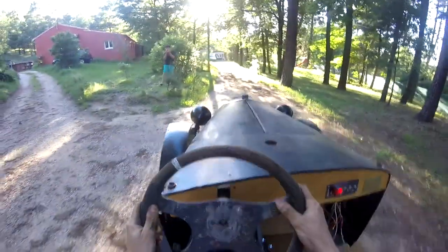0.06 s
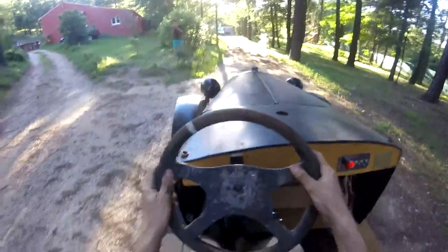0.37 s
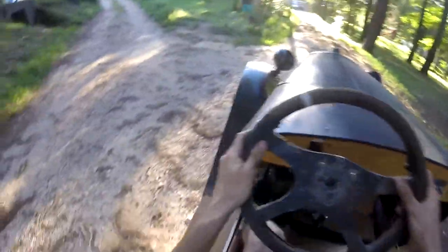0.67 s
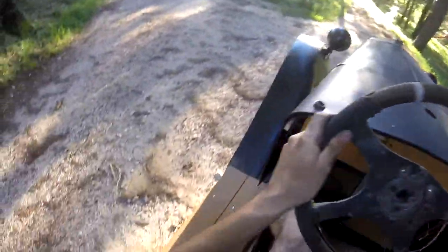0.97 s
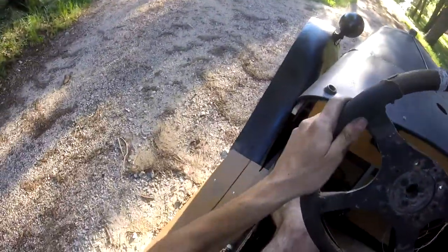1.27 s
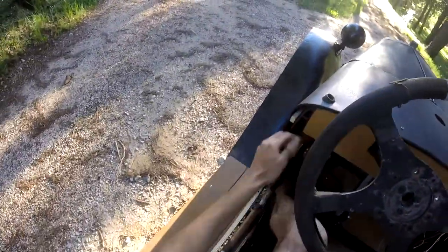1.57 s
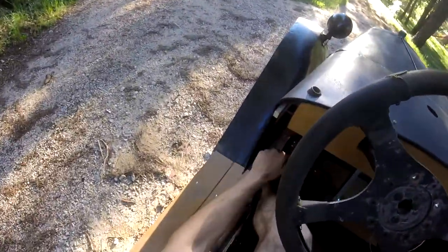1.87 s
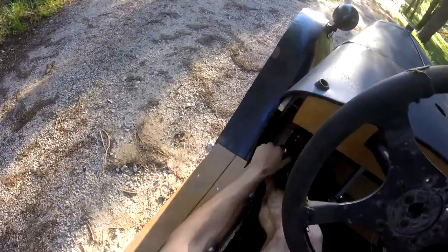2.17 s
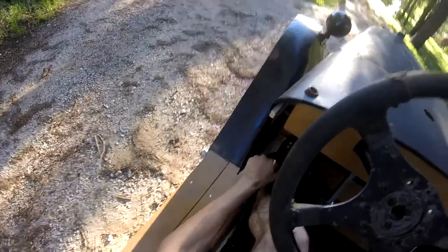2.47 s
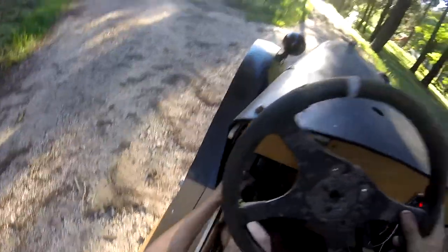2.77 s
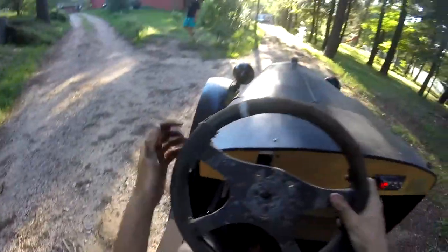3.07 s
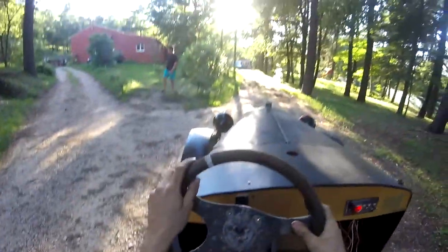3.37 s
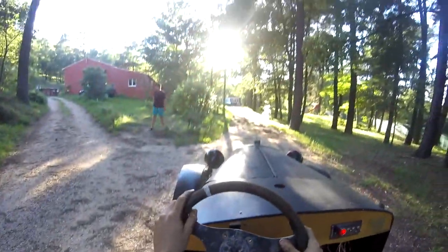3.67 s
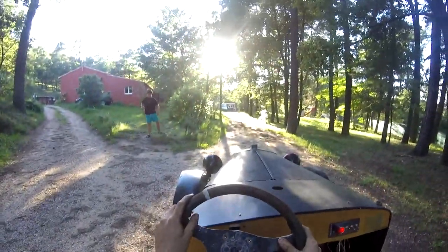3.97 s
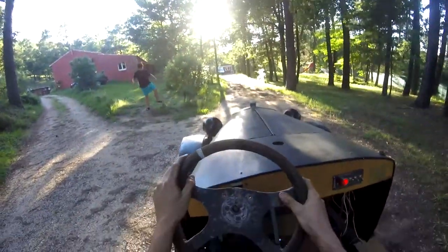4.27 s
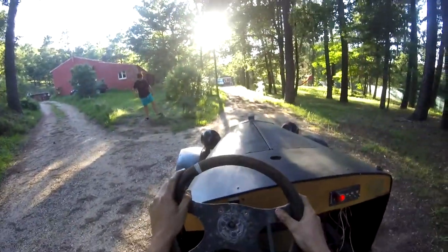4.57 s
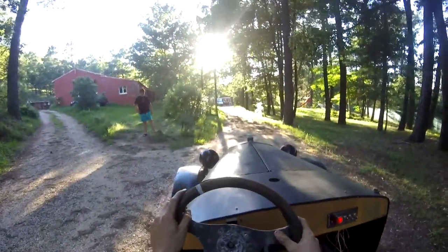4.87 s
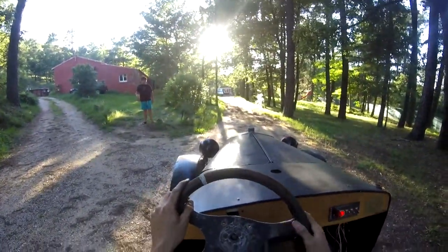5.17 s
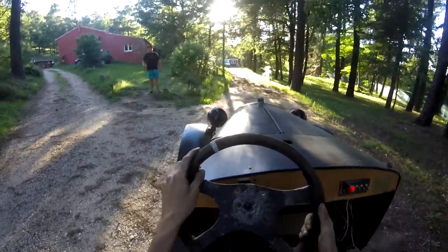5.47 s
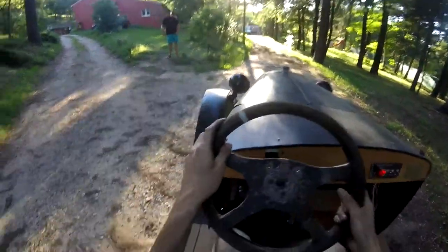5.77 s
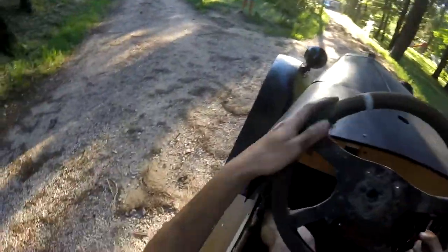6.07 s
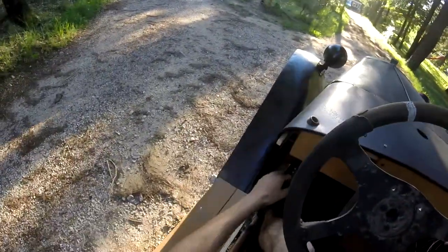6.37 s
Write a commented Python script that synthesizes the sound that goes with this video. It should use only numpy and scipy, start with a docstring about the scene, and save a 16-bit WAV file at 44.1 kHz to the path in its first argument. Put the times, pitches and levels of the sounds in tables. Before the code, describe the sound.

A two-cylinder engine chugs close by as a small open car creeps along outdoors. The exhaust booms in quick, uneven beats under a metallic valve clatter, and the revs climb slowly as the engine takes on load. Loose parts knock a few times. Twice the clatter recedes and the exhaust stands out. A low rumble and faint hiss lie behind, all heard from the driver's seat.

```python
"""On gravel, in the driver's seat of a creeping open kit car; one microphone, close, at the driver's head.
The flat-twin's cylinders fire in turn into a booming exhaust, one with a sharp crack and one muffled,
and the revs slowly rise. Valve gear clatters four times a cycle, a softer puff comes late in each, the
intake rushes and loose parts knock; behind them lie a low rumble, fan hiss and a thin tone. Twice the
driver leans out over the side, away from the engine, and the clatter recedes."""
import sys
import numpy as np
from scipy import signal
from scipy.fft import rfft, irfft, next_fast_len
from scipy.io import wavfile
from scipy.ndimage import uniform_filter1d, map_coordinates

SR = 44100
rng = np.random.default_rng(int(sys.argv[2]) if len(sys.argv) > 2 else 0)


def pcm_store(signal):
    """Save signal as 16-bit PCM."""
    levels = np.round(np.clip(np.atleast_2d(signal), -1, 1) * 32767)
    wavfile.write(sys.argv[1], SR, levels.astype(np.int16).T)


N = 287091
T = np.arange(N) / SR
UNEVEN_DB = .3  # spread from one blast, or one intake breath, to the next

# Spectrum of rattling metal. Each row: frequency in Hz, relative level in dB.
METAL_SPECTRUM = [(900, -26), (1400, -4), (2000, 8.5), (2450, 1), (2800, 2.5), (3500, 3.5), (4500, 1),
                  (5500, -2), (6800, -4.5), (9000, -14), (11000, -16), (13500, -25), (15000, -59)]


def amp(db):
    """Decibels to gain."""
    return 10 ** (np.asarray(db) / 20)


def unit(x):
    """Scales to rms 1."""
    return x / np.sqrt(np.mean(x ** 2) + 1e-20)


def curves(rows):
    """Each column of a time table, at every sample."""
    times, *columns = np.transpose(rows)
    return [np.interp(T, times, column) for column in columns]


def bump(centre_s, half_s):
    """A bell curve in time, of height 1."""
    return np.exp(-((T - centre_s) / half_s) ** 2)


def spectrum(rows, hz, column=1):
    """Gain of one dB column of a frequency table."""
    table = np.transpose(rows)
    return amp(np.interp(np.log(hz + 1), np.log(table[0] + 1), table[column]))


def colour(x, rows):
    """Gives x a spectrum, at rms 1."""
    size = next_fast_len(N)
    gain = spectrum(rows, np.fft.rfftfreq(size, 1 / SR))
    return unit(irfft(rfft(x, size) * gain, size)[:N])


def highpass(x, hz, order):
    """Cuts the bass below hz."""
    return signal.sosfilt(signal.butter(order, hz, "high", fs=SR, output="sos"), x)


def resonance(x, hz, width_hz):
    """One resonance of gain 1."""
    return signal.lfilter(*signal.iirpeak(hz, hz / width_hz, fs=SR), x)


def causal(gain):
    """The impulse response that has this gain and rings only after the blow."""
    log_gain = np.log(np.maximum(gain, 1e-6))
    mirrored = np.r_[log_gain, log_gain[-2:0:-1]]
    minimum_phase = np.exp(np.conj(signal.hilbert(mirrored)))
    return np.fft.ifft(minimum_phase).real[:len(gain)]


def ring(x, response):
    """Convolution, cut to length."""
    return signal.oaconvolve(x, response)[:N]


def dying(t60):
    """A quarter second of decay, falling 60 dB in t60 seconds."""
    return np.exp(-np.log(1000) * T[:SR // 4] / t60)


def strokes(cycles, share, spread_db, early_s=0.):
    """One click an engine cycle at the given share of it, each a little different in size."""
    places = np.arange(int(cycles[-1]) + 1) + share
    times = np.interp(places, cycles, T, right=T[-1] + 1) - early_s
    size = amp(spread_db * rng.standard_normal(len(times)))
    heard = (times >= 0) & (times < T[-1])
    return np.bincount((times[heard] * SR).astype(int), size[heard], N)


def leaning():
    """How far driver and microphone lean out, from 0 upright to 1; each move starts and ends gently."""
    # Each row: start of the lean, time back upright, length of a move, all in seconds.
    leans = [(.4, 3.41, 1), (5.5, 8, 0.61)]
    ramps = sum(np.clip(np.minimum(T - start, end - T) / move, 0, 1) for start, end, move in leans)
    return np.sin(np.pi / 2 * ramps) ** 2


def rumble(level_db):
    """Steady low rumble with a few hollow peaks in the low middle."""
    # Each row: frequency in Hz, relative level of the rumble in dB.
    rumble_spectrum = [(15, 0), (40, 0), (100, 2), (180, 2), (250, -3), (330, 4), (400, 0), (500, 3),
                       (590, 4), (670, 1), (760, 3), (880, -4), (960, -2), (1300, -16), (3000, -60)]
    return amp(level_db) * colour(rng.standard_normal(N), rumble_spectrum)


def thin_tone(waver):
    """A faint, slightly unsteady sine, perhaps a dragging brake."""
    # Each row: time in seconds, pitch in Hz, level in dB.
    tone_path = [(0, 490, -70), (.9, 490, -43), (2.4, 540, -54), (3.6, 592, -89), (4.5, 619.6, -43),
                 (5.9, 627, -38), (6.5, 600, -36)]
    hz, level_db = curves(tone_path)
    drift = unit(uniform_filter1d(rng.standard_normal(N), size=2000))
    phase = 2 * np.pi * np.cumsum(hz * (1 + waver * drift)) / SR
    return np.sqrt(2) * amp(level_db) * np.sin(phase)


def cooling_fan(level_db):
    """The fan hisses evenly, with no bass."""
    # Each row: frequency in Hz, relative level of the hiss in dB.
    hiss_spectrum = [(1400, 6.5), (2800, -10), (3800, 1), (5000, -1), (7000, -5.5), (9000, -12.5),
                     (11000, -18.5), (13500, -25), (15000, -37)]
    return amp(level_db) * colour(highpass(rng.standard_normal(N), hz=900, order=4), hiss_spectrum)


def intake(cycles, load, press, lean):
    """The intake opens with the accelerator, pulses at each piston's draw and rasps alike each cycle."""
    # Each row: frequency in Hz, relative level of the rush in dB.
    rush_spectrum = [(1000, 13), (1350, -16.5), (1700, 3.5), (2000, 2.5), (2250, -1.5), (2430, 2.5),
                     (2750, -12.5), (3300, -2.5), (6000, -42)]
    repeat = .35  # share of the power that is the same in every cycle
    level_db = -42.5 + 3 * load + 2.5 * press - .5 * lean
    draw = 1 + .068 * np.cos(4 * np.pi * (cycles - .06))
    rush, breath = highpass(rng.standard_normal((2, N)), hz=900, order=4)
    breath = breath[:SR // 10] * signal.windows.tukey(SR // 10)
    rasp = colour(ring(strokes(cycles, 0, UNEVEN_DB), breath), rush_spectrum)
    air = np.sqrt(repeat) * rasp + np.sqrt(1 - repeat) * colour(rush, rush_spectrum)
    return amp(level_db) * draw * air


def late_puff(cycles):
    """A softer puff late in each cycle, ringing on two hollow notes."""
    # Each row: time in seconds, level of the low note in dB, level of the high note in dB.
    puff_levels = [(0, -27, -27), (1.4, -31, -30), (2.6, -24, -28), (3.3, -18.5, -21), (4.1, -19, -19),
                   (4.9, -30, -21), (5.6, -34, -22), (6.5, -28, -17)]
    low_hz, high_hz, rise_s = 321.5, 592.6, .006
    rough, width_hz = .7, 130  # share of turbulence in the puff, and its bandwidth
    t = T[:SR // 10]
    swell = (t / rise_s * np.exp(1 - t / rise_s)) ** 2
    clicks = strokes(cycles, share=.705, spread_db=.2)
    out = np.zeros(N)
    for hz, db in zip((low_hz, high_hz), curves(puff_levels)):
        puffs = clicks * amp(db)
        whirl = unit(resonance(resonance(rng.standard_normal(N), hz, width_hz), hz, width_hz))
        note = ring(puffs, swell * np.sin(2 * np.pi * hz * t))
        out += np.sqrt(1 - rough) * note + np.sqrt(rough / 2) * ring(puffs, swell) * whirl
    return out


def knocks(rattle_t60):
    """Loose parts knock: each rings one note and shakes out a brief metallic rattle."""
    # Each row: start in seconds, level in dB, pitch in Hz, t60 in seconds, rattle in dB re the knock.
    hits = [(0.552, -18, 206, 0.11, -20.5), (0.552, -26, 1890, 0.044, -6), (0.572, -32, 1930, .05, -4),
            (0.576, -12, 150, 0.082, -23), (.632, -16, 229, 0.16, -29), (0.73, -33, 3900, 0.031, 3),
            (0.904, -35, 4700, .03, 0), (1.996, -17, 167, 0.18, -14), (2.109, -14.5, 460, 0.11, -33),
            (3.692, -24, 4370, 0.033, -4), (4.084, -31, 4480, 0.024, -11), (4.616, -30, 4420, 0.036, 3),
            (4.989, -28, 4420, 0.034, -12), (5.724, -25, 4400, 0.029, -17)]
    grit = colour(rng.standard_normal(N), METAL_SPECTRUM)
    out = np.zeros(N)
    for start_s, db, hz, t60, rattle_db in hits:
        fade = dying(t60)
        span = slice(round(start_s * SR), round(start_s * SR) + len(fade))
        note = fade * np.sin(2 * np.pi * hz * T[:len(fade)])
        rattle = amp(rattle_db) * dying(rattle_t60) * grit[span]
        out[span] += amp(db) * (note + rattle)
    return out


def clatter(cycles, load, press, lean):
    """Tappets and gear lash strike the crankcase; each clack has its own rings and some loose rattle."""
    # The four clacks. Each row: place as a share of the cycle, level upright at idle in dB, change
    # leaning out in dB, change per step of load in dB, t60 in seconds, centre of a treble band in Hz,
    # boost or cut of that band in dB.
    clacks = [(.005, -23.5, -9, -2.5, 0.032, 3300, -2.5), (.218, -33.5, 0.5, 0.64, 0.065, 6600, 2),
              (.462, -28.5, -6, -1, 0.04, 8600, 9), (.765, -40, -11, 1.5, 0.15, 7500, -10)]
    # Modes of the struck parts, one list a clack. Each row: pitch in Hz, t60 in seconds, level in dB
    # re the clack, change leaning out in dB, change per step of load in dB.
    part_modes = [
        [(1682, 0.071, -12.5, 13.5, -2), (1984, 0.21, -26, 6, 7.5), (2135, 0.059, -21.5, 0, 7.5),
         (3153, 0.041, -6.5, -17, -5), (4350, 0.018, 0.5, -7, 0)],
        [(2020, 0.13, -17.5, 2.5, 6.5), (2093, 0.073, 1.5, -6, -5), (2285, 0.035, 9, -20, -2.5),
         (2414, 0.18, -11.5, 9.5, -3.5), (2600, 0.14, -7, -18, -0.5), (3500, 0.16, -11, -8, -15),
         (3850, 0.088, -17, 12.5, -3.5), (5710, 0.076, -17.5, 11.5, -1.5), (6900, 0.037, -12, 2, 4)],
        [(1307, 0.035, -19, 27, -21), (1487, 0.057, -14, 10, 2), (2313, 0.12, -9, -2, -1),
         (2590, 0.15, -17.5, -7, 1), (2930, 0.027, 1.5, -15, -8), (4720, 0.059, -5.5, -7, -3.5),
         (6490, 0.19, -20.5, -5, 1)],
        [(2166, 0.027, 4.5, -20, -7), (3800, 0.05, -18, -6, 8)],
    ]
    repeat = .75  # share of the grit's power that is the same in every cycle
    stir_db = 1.5  # spread of each mode from clack to clack
    onset = dying(t60=.0066)  # taken off each decay to soften the attack
    # The clacks harden under the accelerator; early on their level dips briefly.
    shared_db = 2.5 * press - 4.7 * bump(centre_s=.79, half_s=.21)
    metal_hz, metal_db = np.transpose(METAL_SPECTRUM)
    out = np.zeros(N)
    for (share, idle_db, lean_db, load_db, t60, band_hz, band_db), modes in zip(clacks, part_modes):
        level_db = idle_db + lean_db * lean + load_db * load + shared_db
        blows = strokes(cycles, share, spread_db=1.1) * amp(level_db)
        band = np.exp(-(2 * np.log2(metal_hz / band_hz)) ** 2)
        grit = colour(rng.standard_normal(N), np.c_[metal_hz, metal_db + band_db * band])
        fade = dying(t60) - onset
        out += np.sqrt(repeat) * ring(blows, fade * grit[:len(fade)])
        out += np.sqrt(1 - repeat) * ring(blows, fade) * grit
        at = np.flatnonzero(blows)
        for hz, mode_t60, mode_db, mode_lean_db, mode_load_db in modes:
            ring_db = mode_db + mode_lean_db * lean[at] + mode_load_db * load[at]
            size = blows[at] * amp(ring_db + stir_db * rng.standard_normal(len(at)))
            note = (dying(mode_t60) - onset) * np.sin(2 * np.pi * hz * T[:len(fade)])
            out += ring(np.bincount(at, size, N), note)
    return out


def glinting(x, patchy_db):
    """No two clacks stir the same metal modes: narrow, brief patches of colour."""
    frames = signal.stft(x, nperseg=1024)[2]
    patches = unit(uniform_filter1d(rng.standard_normal(frames.shape), size=4, axis=0))
    gain = unit(amp(patchy_db * patches))
    return signal.istft(frames * gain, nperseg=1024)[1][:N]


def echoes(x):
    """Ground and panels close by throw the crack back at the microphone as a short patter."""
    level_db, echoes_per_s = -9, 2000
    fade = dying(t60=.1)
    signs = rng.choice([-1., 1.], len(fade))
    taps = signs * (rng.random(len(fade)) < echoes_per_s / SR) * fade
    taps[:SR // 250] = 0  # nothing returns in the first 4 ms
    return amp(level_db) * ring(highpass(x, hz=389, order=4), taps / np.linalg.norm(taps))


def bite(cycles, t60):
    """Each crack of the loud cylinder spits a short burst of noise, never twice the same."""
    # Each row: frequency in Hz, relative level of the burst in dB.
    burst_spectrum = [(250, -10), (600, 8.5), (1000, -2), (1300, -14.5), (1800, -14), (2600, -21),
                      (6000, -45)]
    # Each row: time in seconds, level of the bursts in dB.
    burst_levels = [(0, -25), (.95, -24), (1.5, -30), (1.92, -28), (2, -19), (2.1, -28), (3.3, -26),
                    (5.7, -29), (6.1, -24), (6.5, -24)]
    level_db, = curves(burst_levels)
    cracks = strokes(cycles, share=0, spread_db=1) * amp(level_db)
    return ring(cracks, dying(t60)) * colour(rng.standard_normal(N), burst_spectrum)


def silencer(x, hold_hz, width_hz):
    """A chamber holds the middle of each crack back for a moment, so that it rings as a short bark."""
    radius = np.exp(-np.pi * width_hz / SR)
    poles = [1, -2 * radius * np.cos(2 * np.pi * hold_hz / SR), radius ** 2]
    return signal.lfilter(poles[::-1], poles, x)  # all-pass


def gliding(x, cycles, depth, low_hz, high_hz):
    """The pipe's middle resonances start low at each crack and slide up as it dies away."""
    middle = signal.sosfiltfilt(signal.butter(4, [low_hz, high_hz], "band", fs=SR, output="sos"), x)
    delay_samples = depth / (2 * np.pi * np.gradient(cycles)) * np.sin(2 * np.pi * cycles)
    return x - middle + map_coordinates(middle, [np.arange(N) - delay_samples], order=1)


def swelling(x):
    """As the car turns, one band of the exhaust after another swells and rings longer."""
    # Each row: peak time in seconds, seconds to either side, centre in Hz, width in Hz, boost in dB.
    swells = [(2.55, .5, 767, 110, 3), (3.3, 0.24, 980, 150, 5), (3.1, 0.66, 1020, 91, 0.5),
              (6.3, 0.65, 466, 54.6, 6.5), (6.3, 0.37, 605, 60, 5), (6.3, 0.23, 673, 70, 0.5),
              (6.3, 0.44, 940, 130, 3)]
    out = x.copy()
    for peak_s, half_s, hz, width_hz, db in swells:
        out += (amp(db) - 1) * bump(peak_s, half_s) * resonance(x, hz, width_hz)
    return out


def blasts(cycles, share, early_s):
    """One cylinder's blasts; each trails a puff of whirling gas that leaves the bass steady."""
    turbulence, fade = .15, dying(t60=.1)
    clicks = strokes(cycles, share, UNEVEN_DB, early_s)
    puff = ring(clicks, fade / np.linalg.norm(fade)) * rng.standard_normal(N)
    return clicks + turbulence * highpass(puff, hz=400, order=2)


def exhaust(cycles, speed, blast_db, load):
    """Two blasts a cycle ring the pipe; its upper resonances grow as the engine pulls."""
    # Pipe resonances. Each row: centre in Hz, width in Hz, gain in dB idling, rolling and pulling.
    pipe_modes = [(24, 3.1, -29, -46, -45), (58.4, 6.3, -17, -11.5, -21), (77.9, 16.3, -7.5, -8, -5),
                  (102.7, 20.4, -0.5, 2, -0.74), (163.6, 4.8, -14.5, -28, -15),
                  (181.3, 13.6, -10.5, -15.5, -8), (216.8, 27.6, -23, -22.5, -19.5),
                  (305, 57, -20, -22.5, -13.5), (333.5, 29, -17.5, -17.5, -7), (391.6, 60, -22, -24.5, -20),
                  (486, 150, -26, -26, -26.5), (566, 48, -30.5, -27, -17), (677, 88, -22, -33, -27.5),
                  (741.3, 102, -29.5, -21.5, -15), (813, 52, -23.5, -26, -23), (888, 23, -21.5, -23, -27),
                  (968, 31, -28, -27.5, -55), (1118, 145, -37.5, -35, -37), (1240, 85, -40, -52, -55),
                  (1760, 580, -49, -54.5, -44.5)]
    # Second cylinder against the first. Each row: frequency in Hz, gain in dB off load and pulling.
    muffling = [(64.3, -9.5, -2), (121, 0.5, 2.5), (146, -16.5, -1), (173.2, -6, 13), (237, -4, -10.5),
                (353, -7.5, -4), (580, -5.5, -5.5), (735, -12.5, -9), (1200, -8.5, -10.5)]
    crack_db = .5  # extra sharpness above the boom
    push = amp(blast_db) * SR / speed
    sharp = push * blasts(cycles, share=0, early_s=.00094)
    # The second cylinder's gas has a shorter way out, so it comes a little early.
    dull = push * blasts(cycles, share=.5, early_s=.004363)
    hz = np.fft.rfftfreq(16384, 1 / SR)
    mode_hz, width_hz, *db_by_load = np.transpose(pipe_modes)
    peaks = 1 / (1 + (2 * (hz[:, None] - mode_hz) / width_hz) ** 2) ** 2
    out = np.zeros(N)
    for step, mode_db in enumerate(db_by_load):
        blend = np.maximum(1 - abs(np.clip(load, 0, 2) - step), 0)
        pipe_gain = np.sqrt(peaks @ amp(mode_db) ** 2)
        muffled_gain = pipe_gain * spectrum(muffling, hz, column=max(step, 1))
        out -= ring(blend * sharp, causal(pipe_gain))
        out -= ring(blend * dull, causal(muffled_gain))
    return out + (amp(crack_db) - 1) * highpass(out, hz=300, order=1)


def scene():
    """The seat in mono: the crankshaft times the engine's sounds; throttle and posture set levels."""
    # Each row: time in seconds, engine speed in four-stroke cycles a second.
    revs = [(0.0, 11.093), (0.28, 10.866), (0.81, 11.553), (1.51, 11.968), (1.7, 11.976), (2.18, 12.31),
            (2.56, 12.154), (3.16, 12.575), (3.58, 12.507), (3.93, 12.842), (5.19, 13.588), (5.56, 13.655),
            (6.51, 13.376)]
    # Each row: time in seconds, blast strength in dB, load (0 idling, 1 rolling, 2 pulling).
    throttle = [(0, -20.5, 0.13), (.8, -22, 0.038), (1.55, -22, 0.5), (2.1, -20, 0.88), (3.8, -19.5, 1.41),
                (4.65, -21.5, 1.95), (5.5, -22.5, 1.67), (5.95, -22, 1.54), (6.5, -20, 1.35)]
    speed, = curves(revs)
    blast_db, load = curves(throttle)
    press = bump(centre_s=4.26, half_s=.48)  # one gentle press of the accelerator
    lean = leaning()
    cycles = np.cumsum(speed) / SR - .0835  # the loud cylinder fires at each whole number
    pipe = silencer(exhaust(cycles, speed, blast_db, load), hold_hz=866, width_hz=457)
    pipe = gliding(pipe, cycles, depth=.035, low_hz=213, high_hz=648)
    upright, outside = echoes(pipe), echoes(pipe)  # each microphone position has its own patter
    pipe = swelling(pipe + np.sqrt(1 - lean) * upright + np.sqrt(lean) * outside)
    machine = clatter(cycles, load, press, lean)
    machine += cooling_fan(level_db=-44) + intake(cycles, load, press, lean)
    bursts = bite(cycles, t60=.067) + late_puff(cycles)
    background = rumble(level_db=-38) + thin_tone(waver=.00674) + knocks(rattle_t60=.047)
    return (background + bursts + glinting(machine, patchy_db=1.5) + pipe)[None]


def record(dry):
    """The recorder rounds off the tallest peaks and cuts the highest treble."""
    ceiling, edge_hz = .8, 14900
    rounded = dry / (1 + (dry / ceiling) ** 8) ** (1 / 8)
    lowpass = signal.firwin(511, edge_hz, window=("kaiser", 9), fs=SR)
    return signal.oaconvolve(rounded, lowpass[None], "same")


dry = scene()
out = record(dry)
pcm_store(out)
```